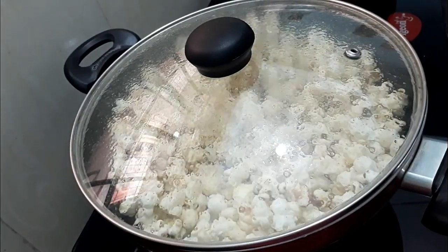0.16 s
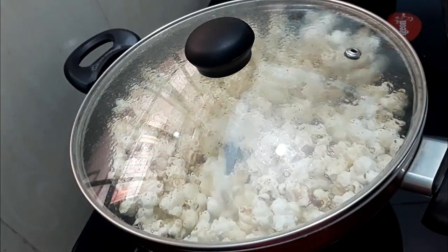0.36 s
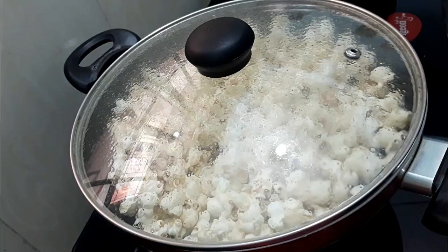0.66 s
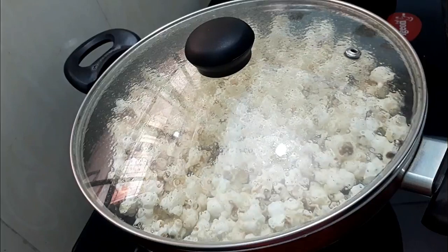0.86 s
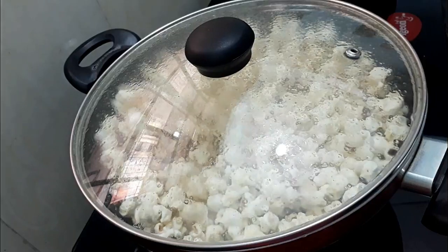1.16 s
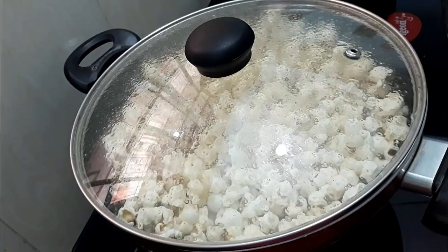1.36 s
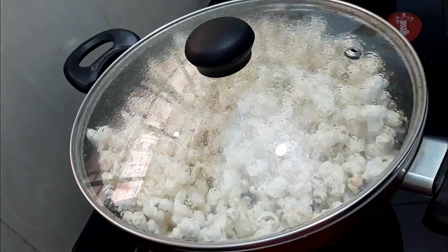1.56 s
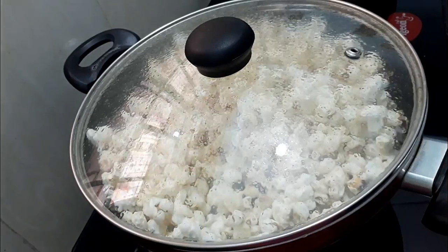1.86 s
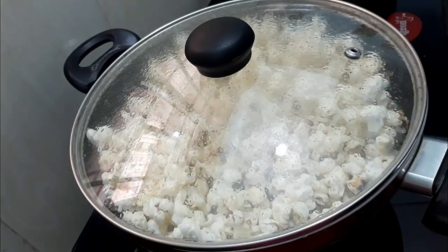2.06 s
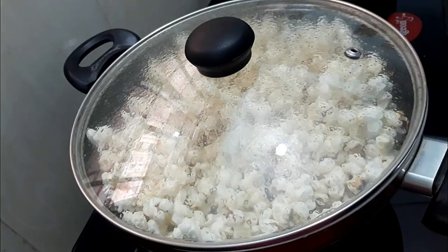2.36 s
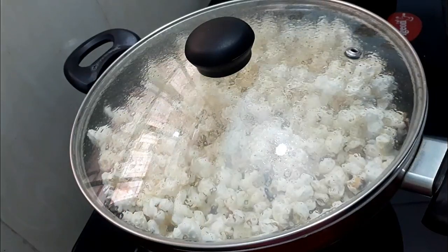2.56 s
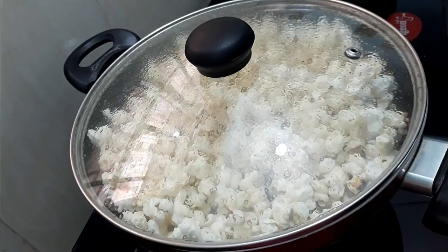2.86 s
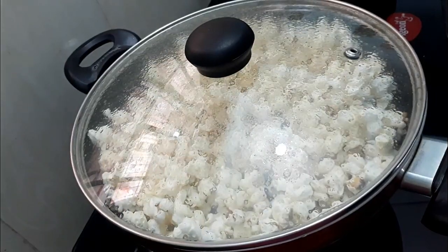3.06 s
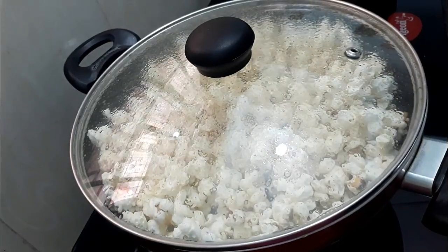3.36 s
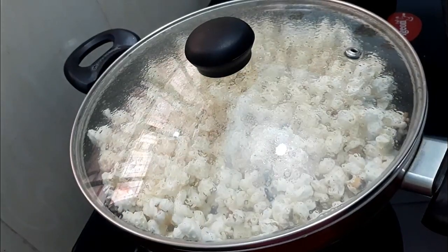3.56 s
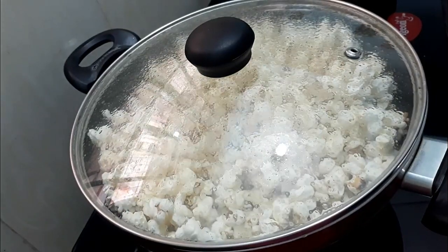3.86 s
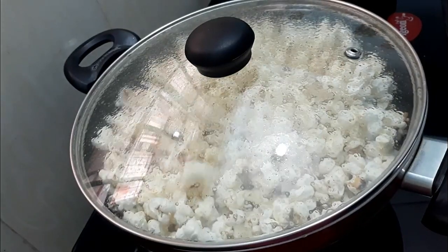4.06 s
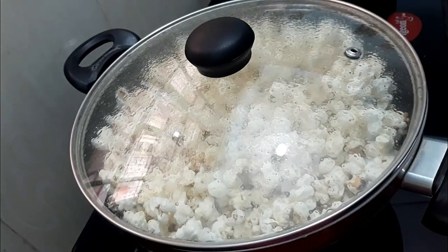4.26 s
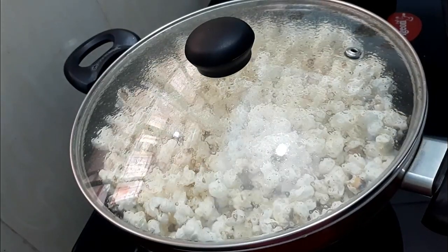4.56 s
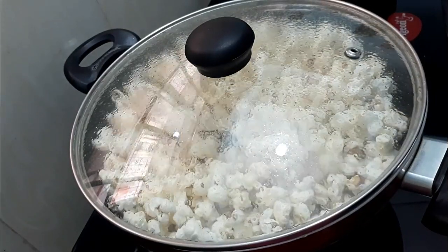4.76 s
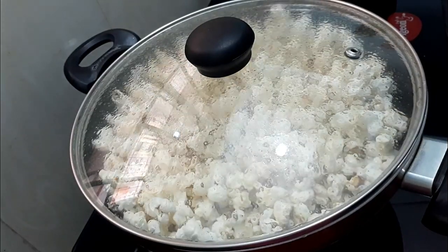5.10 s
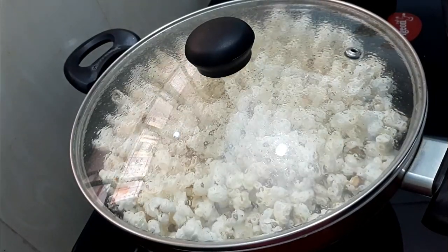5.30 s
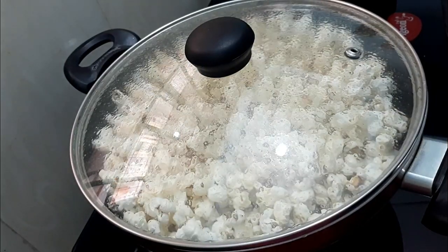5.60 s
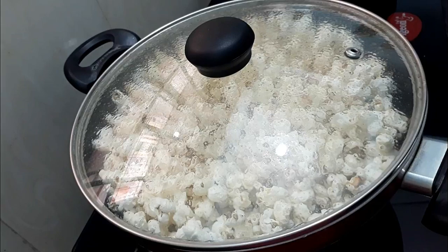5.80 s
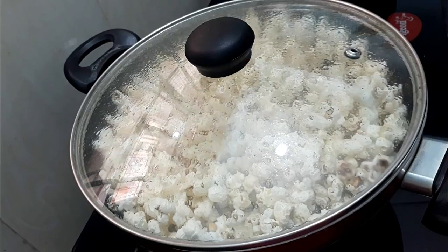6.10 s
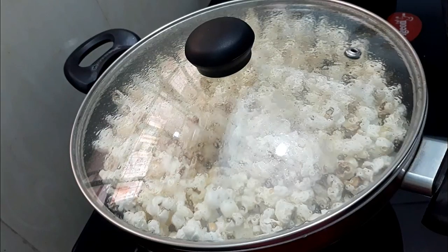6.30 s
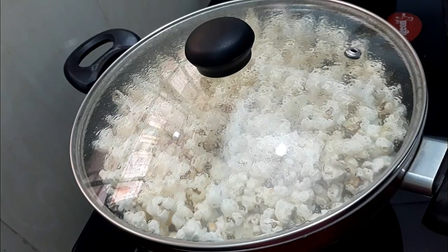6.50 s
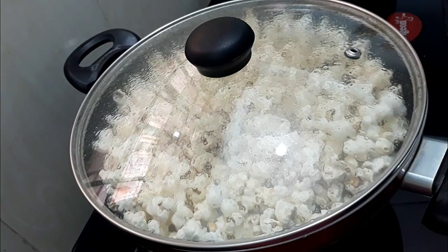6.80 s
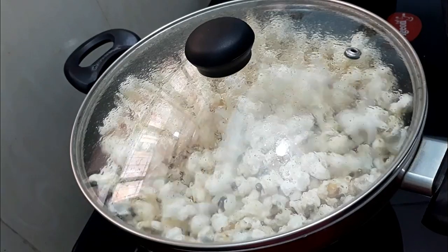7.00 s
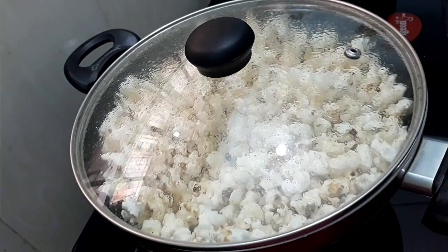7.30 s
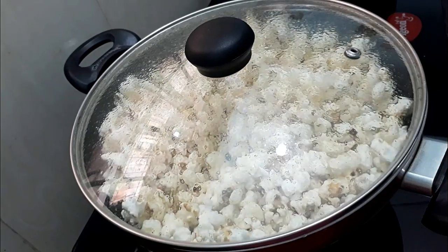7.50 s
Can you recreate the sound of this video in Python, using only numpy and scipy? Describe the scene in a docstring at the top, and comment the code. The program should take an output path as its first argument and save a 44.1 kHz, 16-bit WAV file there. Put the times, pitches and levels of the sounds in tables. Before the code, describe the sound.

Close, uneven popping of corn in a covered pan, snappy and metallic, each pop rattling briefly above a quiet, changing hiss.

```python
"""Corn kernels burst in a steel pan under a glass lid, in a small kitchen, close to a phone microphone.
From the start filtered noise gives burner hiss, and wavering sines hum for a second and again near 6 s.
Each burst in turn cracks (spiky noise), thumps the pan and rings the lid (struck modes), scatters flakes
and swings the stand. All but the first are led by a fainter copy of their own first instant.
At 1.8 s and 7.26 s the tails break off; the hiss is louder after each break."""
import sys
import numpy as np
from scipy import signal
from scipy.fft import rfft, irfft
from scipy.io import wavfile
from scipy.ndimage import uniform_filter1d

SR = 44100
rng = np.random.default_rng(int(sys.argv[2]) if len(sys.argv) > 2 else 0)


def put_to_file(sound):
    """Save the sound as 16-bit audio at rate SR, in the file named by the first command-line argument."""
    columns = np.atleast_2d(sound).T  # one column per channel
    safe = np.clip(columns, -1, 1)
    whole_steps = np.round(safe * 32767)
    wavfile.write(sys.argv[1], SR, whole_steps.astype(np.int16))


N = 337100
SIZE = 24576  # samples a burst lasts
BURST_T = np.arange(SIZE) / SR  # s
BURST_HZ = np.fft.rfftfreq(SIZE, 1 / SR)


def gain_of(db):
    """Decibels to amplitude."""
    return 10 ** (np.asarray(db) / 20)


def evened(x):
    """Scales to rms 1."""
    return x / np.sqrt(np.mean(x ** 2) + 1e-20)


def read(points, hz):
    """Reads a spectrum table on a log-frequency axis."""
    f, value = np.transpose(points)
    return np.interp(np.log(hz + 1), np.log(f + 1), value)


def add(mix, s, sound):
    """Mixes a sound in at time s."""
    part = mix[max(round(s * SR), 0):][:len(sound)]
    part += sound[:len(part)]


# spectrum of burner and kitchen: (frequency [Hz], relative level [dB per Hz])
HISS_SPECTRUM = [(15, -58.5), (25, -27), (49, -15.5), (111, -6.5), (145, -6.5), (180, -5), (309, -16.5),
                 (394, -7.5), (503, -19), (560, -15), (1520, -18.5), (7110, -22.5), (9000, -22),
                 (10000, -26), (16000, -31)]
# hiss and rustle between bursts, ahead of the microphone: (time [s], level [dB])
HISS_LEVEL = [(0, -52.5), (.3, -73), (1.1, -63), (1.68, -66.5), (1.8, -58), (2.2, -60.5), (2.6, -55.5),
              (2.999, -74), (3.401, -72.5), (3.898, -71), (4.499, -69.5), (4.948, -73), (5.601, -73.5),
              (6.1, -72.5), (6.901, -71.5), (7.25, -72.5), (7.3, -54.5), (7.64, -62)]


def hiss():
    """Burner and kitchen: shaped noise in which drifting patches of pitch and time stand out."""
    frames, hz = N // 256 + 5, np.fft.rfftfreq(1024, 1 / SR)
    real, imaginary, patches = rng.standard_normal((frames, 513, 3)).T
    patches = uniform_filter1d(patches, 10, axis=0)  # over pitch
    patches = evened(uniform_filter1d(patches, 8, axis=1))  # over time
    shape = gain_of(read(HISS_SPECTRUM, hz)[:, None] + 2.3 * patches)
    noise = signal.istft((real + 1j * imaginary) * shape, nperseg=1024, noverlap=768)[1]
    s, db = np.transpose(HISS_LEVEL)
    return evened(noise[:N]) * gain_of(np.interp(np.arange(N) / SR, s, db))


# faint low tones that come and go: (start [s], end [s], frequency [Hz], level [dB])
HUM_TONES = [(-.1, 1.17, 46.2, -58), (-.1, 1.17, 115.5, -66), (-.1, 0.313, 174, -74),
             (5.825, 6.173, 176.6, -73)]


def hum():
    """Low sines whose pitch wavers a little; each swells in and fades."""
    t, out = np.arange(N) / SR, np.zeros(N)
    for start, end, hz, db in HUM_TONES:
        waver = evened(uniform_filter1d(rng.standard_normal(N), 3000))
        tone = np.sin(2 * np.pi * np.cumsum(hz * (1 + 0.014 * waver)) / SR)
        fade = np.clip(np.minimum(t - start, end - t) / 0.051, 0, 1)
        out += gain_of(db) * tone * fade
    return out


def stand_swing(s, thump_db):
    """The pan rocks on its burner stand: a low sine that rises slowly, stronger for a stronger thump."""
    pitch_hz, t60, rise_s = 83, 0.55, 0.085
    db = -10.5 + 0.82 * thump_db
    # phase runs on the scene's clock, so overlapping swings add without cancelling
    swing = np.sin(2 * np.pi * pitch_hz * (s + BURST_T))
    return gain_of(db - 60 * BURST_T / t60) * swing * (1 - np.exp(-BURST_T / rise_s))


def responses(modes, longest):
    """Spectrum of each mode's dying sine, one row a mode; the heap of flakes damps every ring."""
    hz, db, t60 = np.transpose(modes)[:, :, None]
    t60 = np.minimum(t60, longest / (1 + hz / 6000))
    return rfft(gain_of(db - 60 * BURST_T / t60) * np.sin(2 * np.pi * hz * BURST_T))


def struck(modes, near_hz, slope_db, least_db, chance_db):
    """The spot that is hit favours the modes near one pitch; the rest differ from kernel to kernel."""
    octaves = np.abs(np.log2(np.transpose(modes)[0] / near_hz))
    chance = chance_db * rng.standard_normal(len(modes)) * np.minimum(1, 8 * octaves)
    return gain_of(np.maximum(-slope_db * octaves, least_db) + chance)


def blows_of(per_s, db):
    """Sparse blows of random size and sign after a first blow of 1; db is their fading level."""
    blows = (rng.random(SIZE) < per_s / SR) * rng.standard_normal(SIZE) * gain_of(db)
    blows[0] = 1
    return blows


# modes of the pan bottom: (frequency [Hz], level [dB], t60 before damping by the flakes [s])
PAN_MODES = [(116, -4, 0.12), (143.9, 1.5, 1), (157.8, 0.5, 0.75), (244.4, -2, 0.19), (307, -6.5, 0.02),
             (340.2, 1, 0.45), (385, -4, 0.055), (469.8, -3.5, 0.36), (526.3, -13.5, 0.045),
             (660, -16, 0.42)]


def pan_thump(tilt, pan_modes):
    """The pan bottom takes a few blows while the burst lasts and rings in its low modes."""
    blows = blows_of(150, -3.5 - 60 * BURST_T / 0.083)
    weights = struck(PAN_MODES, 152., 1.3, -10.5, 1.8)  # every burst favours modes near 152 Hz
    weights = weights * gain_of(read(tilt[:2], np.transpose(PAN_MODES)[0]) - 14.5)
    return irfft(rfft(blows) * (weights @ pan_modes)) * (1 - np.exp(-BURST_T / 0.011))


# modes of glass lid and steel wall: (frequency [Hz], level [dB], t60 before damping by the flakes [s])
LID_MODES = [(828.6, -2, 0.18), (942, -1, 0.45), (1120, -25.5, 0.033), (1233, 0.5, 0.17), (1302, -5, 0.21),
             (1457, 5.5, 0.029), (1594, -11.5, 0.36), (1951, 1, 0.17), (2020, -1.5, .12),
             (2437, -0.5, 0.08), (2490, -18, 0.14), (2715, -4, 0.085), (2910, -16.5, .12),
             (3040, 2.5, 0.36), (3191, 4.5, 0.048), (3490, 1.5, 0.3), (3747, 3.5, 0.16), (3994, 2, 0.3),
             (4500, -11, 0.11), (5230, 3, 0.17), (6000, 1.5, .08), (6520, 1, .08), (6310, -3, 0.24),
             (7090, -20.5, 0.12), (7250, 0, .07), (8700, 5, 0.065), (8770, -8.5, .06)]


def lid_ring(tilt, lid_modes, ring_hz, ring_db, low_ring_hz, body_db, t60):
    """The burst strikes the lid near two pitches; flakes keep tapping it, ever softer."""
    low_ring_db = -2.5 + 0.86 * body_db  # the low ring follows the body
    taps = blows_of(300, -7.5 - 60 * BURST_T / (1.2 * t60)) * (BURST_T < .3)
    high_ring = gain_of(ring_db) * struck(LID_MODES, ring_hz, 70., -17.0, 2.8)
    low_ring = gain_of(low_ring_db) * struck(LID_MODES, low_ring_hz, 120.0, -45.5, 0)
    # a dull burst rings dull
    dulling = gain_of(np.minimum(read(tilt[-2:], np.transpose(LID_MODES)[0]), 0))
    return irfft(rfft(taps) * ((high_ring + low_ring) * dulling @ lid_modes))


# sharp snaps that open a burst: (delay after its start [samples])
HULL_SNAPS = [40, 85, 140]


def crackling():
    """Grains of very unlike size, a crackle rather than a hiss, opened by the hull's snaps."""
    grains = rng.standard_normal(SIZE) * gain_of(1.7 * np.minimum(rng.exponential(1, SIZE), 5))
    # the crackle is uneven: random patches of pitch and time stand out
    cells = signal.stft(grains, nperseg=256)[2]
    patches = uniform_filter1d(rng.standard_normal(cells.shape), size=2, axis=0)
    patches = evened(uniform_filter1d(patches, size=5, axis=1))
    grains = signal.istft(cells * gain_of(2 * patches), nperseg=256)[1][:SIZE]
    grains[HULL_SNAPS] += gain_of(15.5) * rng.choice([-1., 1.], len(HULL_SNAPS))
    return grains


# fine colour of a burst as the close microphone takes it: (frequency [Hz], level [dB])
MIC_COLOUR = [(40, -26.5), (95, -15.5), (130, -0.5), (700, 3.5), (1300, 3.5), (3000, -2.5), (5000, -1),
              (7000, 2), (9000, 1), (10000, -1.5), (13000, -7), (15800, -15)]


def crack_and_scatter(tilt, lid_modes, crack_db, t60):
    """Coloured crackle under two envelopes: the tearing hull, then flakes scattering into the room tail."""
    # the lid modes colour the noise too
    humps = gain_of(3. * rng.standard_normal(len(lid_modes)) - 49.5) @ np.abs(lid_modes)
    colour = gain_of(read(tilt, BURST_HZ) + read(MIC_COLOUR, BURST_HZ)) * (1 + humps)
    spectrum = rfft(crackling()) * colour
    scale = np.std(irfft(spectrum * (BURST_HZ > 1500) * (BURST_HZ < 5000)))
    # the treble share dies sooner than the bass share
    dull = 1 / (1 + (BURST_HZ / 3000) ** 2)
    low, high = irfft(spectrum * dull) / scale, irfft(spectrum * (1 - dull)) / scale
    lumps = gain_of(1.8 * evened(uniform_filter1d(rng.standard_normal(SIZE), 160)))
    low_scatter = low * gain_of(-12.5 - 60 * BURST_T / (1.15 * t60))
    high_scatter = high * gain_of(-18.5 - 60 * BURST_T / t60)
    # the hull tears at once, and the pan wall returns the crack a few milliseconds later
    tear = gain_of(-60 * BURST_T / 0.0019)
    wall_return = gain_of(-5.5 - 60 * (BURST_T - .004) / 0.0018) * (BURST_T > .004)
    afterglow = gain_of(-11.5 - 60 * BURST_T / 0.083)
    crack = gain_of(crack_db) * (tear + wall_return + afterglow) * (high + 0.46 * low)
    return crack + lumps * (low_scatter + high_scatter)


def pop(s, row, lid_modes, pan_modes):
    """One burst: crack and scatter, lid ring, pan thump and stand swing, scaled by its strength."""
    db, thump_db, thud_db, body_db, treble_db, ring_hz, low_ring_hz, ring_db, t60, crack_db = row
    t60 = max(t60, .03)
    swell = 1 - np.exp(-BURST_T / 0.00093)
    # (frequency [Hz], level [dB])
    tilt = [(150, thump_db + 15), (420, thud_db + 9.5), (1000, body_db + 0.5),
            (2700, 0.01), (8000, treble_db + 7.0)]
    noise = crack_and_scatter(tilt, lid_modes, crack_db, t60) * swell
    lid = lid_ring(tilt, lid_modes, ring_hz, ring_db, low_ring_hz, body_db, t60) * swell
    sound = noise + lid + pan_thump(tilt, pan_modes) + stand_swing(s, thump_db)
    return gain_of(db) * sound * np.minimum(1, (BURST_T[-1] - BURST_T) / 0.13)


# the bursts; levels after the strength are relative to it, before each band's own trim:
# (time [s], strength [dB], thump [dB], thud [dB], body [dB], treble [dB], high lid pitch [Hz],
#  low lid pitch [Hz], high ring [dB], scatter t60 [s], crack [dB])
BURSTS = [(0.0034, -26.5, -57, -33, -14.5, -2.5, 3770, 1320, -15.5, 0.25, -20),
          (0.3201, -24.5, -15.5, -10.5, -6.5, -2.5, 3080, 1452, -17.5, 0.25, -35),
          (0.4835, -21.5, -33, -39, -23, 2, 6240, 760, -11, 0.28, -5.5),
          (0.5984, -28, -24, -13.5, -16, -0.5, 2430, 1010, -6.5, 0.3, -4.5),
          (0.615, -31.5, -38, -11, -7, -17, 2220, 1415, -12, 0.32, -20),
          (0.8114, -22, -30, -30, -17, -6.5, 2660, 1290, -20, 0.37, -4),
          (1.0035, -42, -19, -19, -24, 1, 3770, 1230, -8, 0.15, -34),
          (1.1569, -33, -11, -10, -6, -7.5, 2280, 1250, -3.5, 0.95, -30),
          (1.2125, -11.5, -37, -26, -16.5, -9, 6000, 1280, -17, 0.22, -7),
          (1.3929, -25.5, -17, -22, -15.5, -16.5, 3420, 1120, -15, 0.31, -21),
          (1.4259, -38, -33, -17, 10, -12, 2910, 1380, 2.5, 0.28, -14),
          (1.4391, -44, -10.5, 0, 8, 18.5, 3080, 933, -20, 0.21, -8),
          (1.4887, -41.5, -59, 2, -2, -29, 3060, 1250, 0, 0.15, -20),
          (1.706, -22, -49, -34, -21.5, -5, 2430, 1190, -8, 0.27, -35),
          (1.793, -45.5, 6, 5, -3, -23, 2420, 790, -16, 0.35, -17),
          (1.9565, -42, -0.5, -15, 7, -9, 2600, 855, -4.5, 0.29, -2.5),
          (2.2736, -20.5, -22, -26.5, -13.5, -6, 2120, 1150, -8, 0.23, -12.5),
          (2.4011, -33.5, -7.5, -12.5, -4, -9, 2620, 820, -8, 0.38, -10),
          (2.628, -53.5, -22, -26, -20, 11, 6000, 775, -1, 0.42, -19),
          (2.718, -26.5, -17, -12.5, -6, -2.5, 4900, 797, -17, 0.29, -18),
          (2.782, -48, -8, 1, -14, -22, 2420, 830, -18, 0.26, -20),
          (2.8099, -38.5, -31, -13, -7, -6, 2660, 826, -18, 0.44, -2),
          (2.8503, -43.5, -28, -15, 1, -20, 2100, 875, -18, 0.33, -15),
          (2.8931, -49.5, -17, -12, -14, -2, 2980, 885, -28, 1, -4),
          (3.1685, -61, -14, -21, -14, 10, 6500, 1310, -7, 0.87, -5),
          (3.2512, -51.5, -24, -24, -28, -15, 1980, 1240, -11, 0.42, -10),
          (3.2843, -62, -22, -31.5, -28, -14, 1950, 1260, -6, 0.15, -2),
          (3.4202, -55, -28.5, -21, -22, -4.5, 6340, 1270, -12, 0.68, 1),
          (3.464, -61.5, 4, 7, -9, -15, 2420, 830, -20, 0.5, -20),
          (3.508, -35, -4, -6.5, -2.5, -15, 2560, 1130, -9, 0.29, -9),
          (3.524, -52.5, -8, -15.5, -1, 6, 2006, 1300, -3.5, 0.51, -6),
          (3.931, -27, -14.5, -17.5, -3, -2.5, 6800, 1160, -4.5, 0.34, 3),
          (3.982, -44, -8, -2, 6, -17, 3260, 1690, -7.5, 0.38, -17),
          (4.2535, -21.5, -21, -19, -18.5, -6, 3900, 1210, -12, 0.28, -1),
          (4.554, -32, -12, -10.5, -7.5, 0, 1830, 1150, -8, 0.29, -12),
          (4.9903, -27, -16.5, -21.5, -4, -15.5, 2430, 847, -9, 0.34, -8),
          (5.0297, -29.5, -20, -16.5, -11.5, -4, 3470, 1320, -22, 0.29, -3),
          (5.1957, -34, -15.5, -26.5, -3, -9.5, 2430, 868, -12.5, 0.31, -3),
          (5.7653, -40, -24.5, -25.5, -13.5, -6, 3300, 1227, -19, 0.22, -7),
          (5.7719, -33, -37.5, -27.5, -16.5, -4, 3340, 1218, -16.5, 0.28, -3.5),
          (6.1623, -37.5, -3.5, -2, 3, -5, 6600, 1010, -15, 0.59, 3),
          (6.1844, -26.5, -17.5, -1, -9.5, -13, 6760, 1330, -3.5, 0.29, -8),
          (6.2055, -33.5, -18, -4.5, -7, -23, 2390, 815, -5.5, 0.32, 7),
          (6.5195, -33.5, -16, -21, 5.5, -9.5, 2420, 785, -4, 0.3, -7.5),
          (6.6281, -43, -26, -28.5, -2, -23, 2420, 1620, -14, 0.3, -8),
          (6.9133, -35.5, -18, -14.5, -13.5, -10.5, 2900, 1215, -15, 0.28, -8),
          (6.9602, -42.5, -33.5, -13.5, -10, -19.5, 3250, 1670, -0.5, 0.21, -22),
          (6.9781, -43.5, -27, -33, -21.5, -22, 3750, 1560, -2.5, 0.2, -21),
          (7.044, -50, -18, -9, -8, -15, 2920, 1410, -19, 0.22, -10),
          (7.2527, -23, -18.5, -20.5, -16, -2, 2430, 1470, -18, 0.26, -23),
          (7.2966, -38.5, -1, -0.5, -4, -12, 2100, 1170, -16, 0.31, -18),
          (7.3135, -45.5, 1.5, 6.5, -12, -19, 2420, 1180, -20, 0.2, -16),
          (7.32, -27.5, -22, -28, -11, -8, 2385, 1580, -5, 0.44, -22),
          (7.3761, -41.5, 2, -3, -5, -9, 2800, 826, -2, 0.6, 16),
          (7.417, -39.5, 0, -15, -2.5, -23, 2540, 1190, -22, 0.47, 8.5),
          (7.452, -45, -20, -3, -2, -19, 1837, 1400, -14, 0.78, -7)]
# the sounding tails stop short: (time [s])
TAIL_BREAKS = [1.8, 7.261]


def popping():
    """All bursts, all but the first led by a fading copy of their start; tails stop at the next break."""
    lead_s, lead_db = .0175, -10  # the copy leads by this time and starts this far below its burst
    mix, lead = np.zeros(N), round(lead_s * SR)
    lid_modes, pan_modes = responses(LID_MODES, .11), responses(PAN_MODES, .26)
    for s, *row in BURSTS:
        sound = pop(s, row, lid_modes, pan_modes)
        early = sound[:lead] * gain_of(lead_db - 2.7 * np.arange(lead) / lead)
        left = min([b - s for b in TAIL_BREAKS if b > s] + [1])  # s until the next break
        add(mix, s, sound * np.clip((left - BURST_T) / 0.002, 0, 1))
        add(mix, s - lead_s, early * (s > lead_s))
    return mix


def scene():
    """Bursts over the hiss and hum."""
    return (hiss() + hum() + popping())[None]


def record(dry):
    """The microphone loses the deepest bass; then a band limit takes off the top treble."""
    thin = signal.sosfilt(signal.butter(N=2, Wn=55., btype="high", fs=SR, output="sos"), dry)
    band_limit = signal.firwin(511, 16100, window=("kaiser", 9), fs=SR)  # Hz
    return signal.oaconvolve(thin, band_limit[None], "same")


dry = scene()
out = record(dry)
put_to_file(out)
```